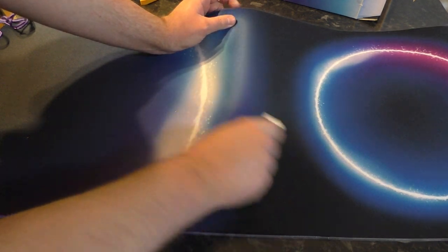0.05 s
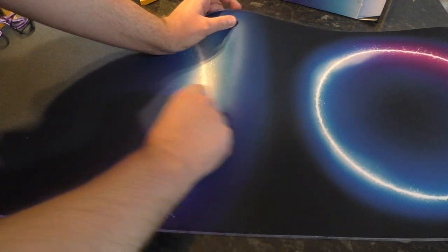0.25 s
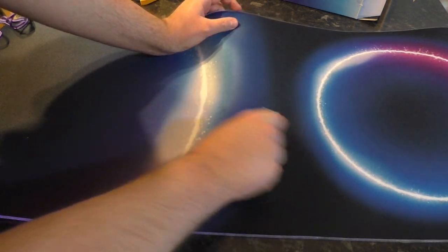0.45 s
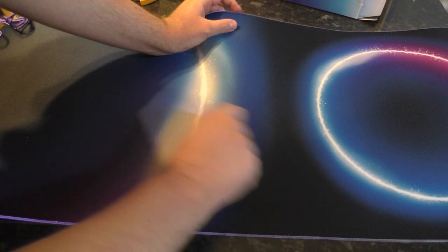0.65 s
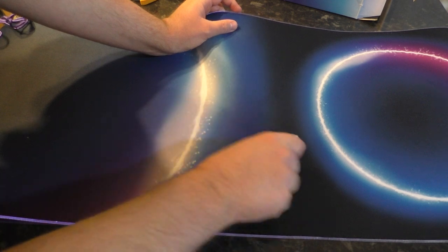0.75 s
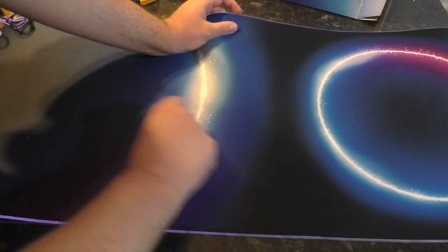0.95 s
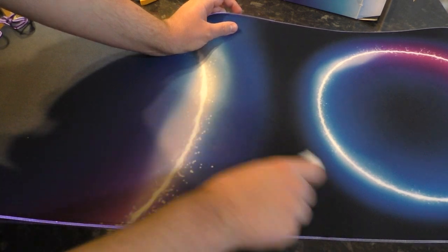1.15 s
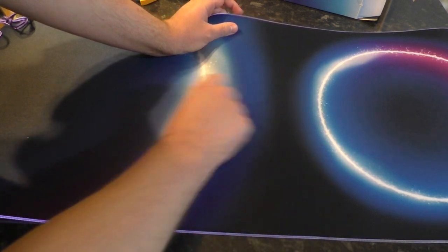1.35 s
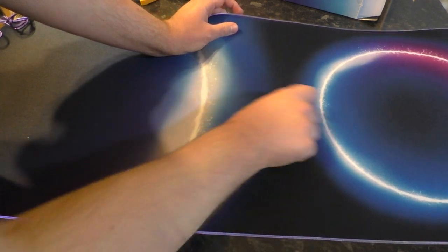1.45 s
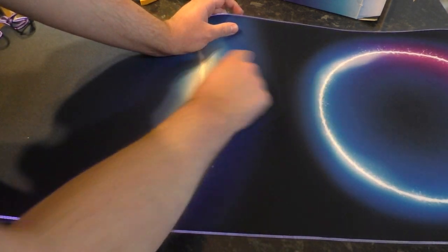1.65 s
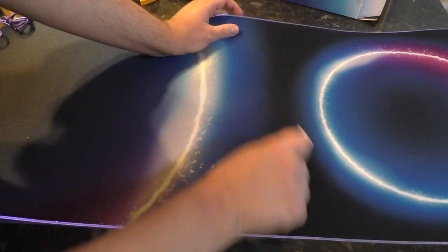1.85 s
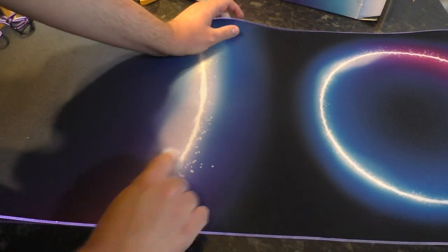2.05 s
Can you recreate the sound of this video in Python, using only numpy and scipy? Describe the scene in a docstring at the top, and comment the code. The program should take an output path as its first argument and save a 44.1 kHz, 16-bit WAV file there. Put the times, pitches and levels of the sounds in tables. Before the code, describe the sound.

Close up in a quiet room, rapid hissing strokes scrub across a fabric mousepad. The object in the hand knocks once and faintly squeaks, the arm bumps the desk with low thuds, then brief ticks and a padded tap follow.

```python
"""A dry hiss swishes back and forth: a fist rubs a small object quickly over a cloth mousepad on a desk,
close to a mono microphone in a quiet room. Fibres catch and let go, so the weave hisses and zips with
the hand's speed; the sharp turns become rounder loops near the end. The desk rumbles and thuds under
the arm. The object knocks hollowly once and squeaks as it sticks and slips; later an edge snags the
cloth with sharp ticks, and a dull tap lands on the padding."""
import sys
import numpy as np
from scipy import signal
from scipy.fft import rfft, irfft, next_fast_len
from scipy.io import wavfile
from scipy.ndimage import map_coordinates

SR = 44100
rng = np.random.default_rng(int(sys.argv[2]) if len(sys.argv) > 2 else 0)


def to_wav(sig):
    """Store sig (one row per channel, or 1-D mono) as 16-bit WAV at the path in sys.argv[1].

    Samples outside -1..1 are clipped; the rate is SR.
    """
    pcm = np.clip(np.atleast_2d(sig), -1, 1) * 32767
    pcm = np.round(pcm).astype(np.int16)
    wavfile.write(sys.argv[1], SR, pcm.T)  # frames by channels


N = 92610
T = np.arange(N) / SR
TOP_HZ = 15780  # the recorder's band limit


def amp(db):
    """Decibels to gain."""
    return 10 ** (np.asarray(db) / 20)


def unit(x):
    """Scale to rms 1."""
    return x / np.sqrt(np.mean(x ** 2) + 1e-20)


def decay(t, t60):
    """An envelope that falls 60 dB in t60 seconds."""
    return 1000 ** (-t / t60)


def filtered(x, response):
    """Filter x by a gain given as a function of frequency."""
    size = next_fast_len(len(x) + 8192)
    return irfft(rfft(x, size) * response(np.fft.rfftfreq(size, 1 / SR)), size)[:len(x)]


def coloured(x, spectrum):
    """Shape x by (f/Hz, level/dB) points and scale to rms 1."""
    f, db = np.transpose(spectrum)
    return unit(filtered(x, lambda hz: amp(np.interp(np.log(hz + 1), np.log(f + 1), db))))


def wobble(per_s):
    """A smooth random curve with per_s knots a second."""
    return map_coordinates(rng.standard_normal(1024), [T * per_s], mode="mirror")


def fuzzy_tone(hz, width_hz):
    """Narrow noise at rms 1 around a pitch given for every sample."""
    a, b = (unit(filtered(rng.standard_normal(N), lambda f: 1 / (1 + (f / width_hz) ** 2)))
            for _ in range(2))
    phase = 2 * np.pi * np.cumsum(hz) / SR
    return unit(a * np.cos(phase) + b * np.sin(phase))


def add(track, start_s, sound):
    """Mix a sound into the track at start_s."""
    part = track[round(start_s * SR):][:len(sound)]
    part += sound[:len(part)]


def shifting_contact(x, depth_db=2, patch_hz=353.4, patch_s=0.05):
    """The colour shifts as the contact changes: random gain patches in time and frequency."""
    hz, t, spectrogram = signal.stft(x, SR, nperseg=512)
    grid = np.meshgrid(hz / patch_hz, t / patch_s, indexing="ij")
    patches = map_coordinates(rng.standard_normal((128, 128)), grid, mode="mirror")
    return signal.istft(spectrogram * amp(depth_db * patches), SR, nperseg=512)[1][:N]


def friction(spectrum, catches_per_s=5000, catch_share=0.29):
    """Countless tiny slips, with stronger grains where fibres catch and let go."""
    catches = unit(rng.standard_normal(N) * (rng.random(N) < catches_per_s / SR))
    slips = rng.standard_normal(N)
    grains = np.sqrt(catch_share) * catches + np.sqrt(1 - catch_share) * slips
    return coloured(shifting_contact(grains), spectrum)


def rubbing():
    """Object on cloth, close up: each stroke speeds up, then slows; faster is louder and brighter."""
    # Hand strokes, each lasting to the next row: turn t/s, speed in the turn/0-1, fastest moment/0-1,
    # level offsets/dB of hiss, treble, rasp, scrape and body, top zip f/Hz
    strokes = [(-.06, 0.23, 0.15, 1.5, -3.5, 2, -3, 2, 6000), (.048, 0.06, .42, 0, -2, 0, -2.5, -2, 6290),
               (.28, 0.27, 0.49, 1, -2.5, 1, 2.5, 5, 6577), (.487, 0.22, 0.41, -1.5, -1.5, 2, -3, 4, 6080),
               (.662, 0.31, 0.54, -2.5, 0.5, 1.5, 1, 1, 6000), (0.829, 0.18, 0.32, 2, -2, 0, -6, 3, 5470),
               (1.011, 0.27, 0.45, -2.5, -0.5, -0.5, -1, -2, 6410),
               (1.207, 0.13, 0.55, 2, 4, 1.5, -3.5, -9, 7640), (1.386, .45, 0.5, 1, 1, 2, 0.5, -1.5, 6430),
               (1.573, 0.32, 0.72, 0.5, 1.5, -2.5, 1, 1, 6650),
               (1.785, 0.9, 0.66, 2.5, 1, 0.5, 3.5, 4.5, 6040),
               (2.015, 0.64, 0.28, -1, -2, -2, -5.5, -14, 7520)]
    # Friction spectra of the five bands, low to high: f/Hz, relative level/dB
    body_spectrum = [(120, -21), (280, -4.5), (430, -2), (590, 2), (740, -14), (1300, -33)]
    scrape_spectrum = [(500, -31), (800, -7.5), (1030, -4.5), (1300, 1), (1520, 1.5), (2000, -7),
                       (3500, -31)]
    rasp_spectrum = [(2400, -22), (3200, -11.5), (3550, -1.5), (3900, -3), (4300, -11), (5500, -36)]
    hiss_spectrum = [(1200, -7), (2100, -6.5), (2600, 1), (3150, -2.5), (3650, -7.5), (4500, -4.5),
                     (6300, -4), (9000, -14), (15500, -21.5)]
    treble_spectrum = [(2500, -40), (4500, -4.5), (6400, -2.5), (7900, 0), (9000, -3), (11500, -7),
                       (14000, -11), (16000, -15.5)]
    last_turn_s = 2.14
    turn_s, turn_speed, fastest, *colours = np.transpose(strokes)
    fastest_s = turn_s + fastest * np.diff(np.r_[turn_s, last_turn_s])
    marks_s = np.sort(np.r_[turn_s, fastest_s, last_turn_s])
    phase = np.interp(T, marks_s, np.arange(len(marks_s))) * np.pi / 2  # half a cycle per stroke
    arch = np.abs(np.sin(phase)) ** 0.82
    loop_speed = np.interp(T, turn_s, turn_speed)  # a rounder turn keeps the hand moving
    speed = np.sqrt(loop_speed ** 2 + (1 - loop_speed ** 2) * arch ** 2)
    hiss_db, treble_db, rasp_db, scrape_db, body_db, zip_hz = (
        np.interp(T, fastest_s, column) for column in colours)

    hiss = amp(-60 + hiss_db) * speed ** 0.83 * friction(hiss_spectrum)
    treble = amp(-58.5 + treble_db) * speed ** 1.41 * friction(treble_spectrum)
    rasp = amp(-63 + rasp_db) * speed * friction(rasp_spectrum)
    dig_db = 2.5 * (0.5 - loop_speed) * np.sin(2 * phase)  # digs in, speeding out of a sharp turn
    scrape_db += dig_db + wobble(per_s=35.44)
    scrape = amp(-64 + scrape_db) * speed ** 0.51 * friction(scrape_spectrum)
    body = amp(-66 + body_db) * speed ** 0.46 * friction(body_spectrum)
    thread_hz = zip_hz * speed  # the threads pass at a rate that follows the hand
    weave_zip = amp(-67.5 + treble_db) * speed * fuzzy_tone(thread_hz, width_hz=270)
    flutter_db = 0.72 * wobble(per_s=70)
    return (hiss + treble + rasp + weave_zip) * amp(flutter_db) + scrape + body


def room_tone():
    """The quiet room behind the desk: steady noise, strongest in the bass."""
    # Room noise spectrum: f/Hz, relative level/dB
    spectrum = [(20, 2.5), (100, -8.5), (250, -15), (550, -15), (800, -23), (1400, -20.5), (3000, -25),
                (8000, -35), (16000, -38)]
    return amp(-68) * coloured(rng.standard_normal(N), spectrum)


def desk_rumble(trim_db=-3.5):
    """The desk shakes with a low rumble while the arm pushes hard."""
    # Strength of the shaking: t/s, level/dB before the trim
    shake = [(0.0, -66), (0.2, -71), (0.24, -44), (0.3, -44.5), (0.33, -33), (0.64, -53), (0.74, -46),
             (0.77, -36.5), (0.81, -40), (1.3, -46.5), (1.34, -68), (1.36, -49), (1.43, -59), (1.46, -61),
             (1.74, -73), (2.1, -57)]
    # Spectrum of the desk's rumble: f/Hz, relative level/dB
    spectrum = [(10, -10), (24, 10), (48, 2), (70, -9), (100, -15), (180, -26), (300, -29.5), (430, -29.5),
                (700, -45), (1500, -110)]
    level_db = np.interp(T, *np.transpose(shake)) + trim_db
    return amp(level_db) * coloured(rng.standard_normal(N), spectrum)


def desk_thuds(attack_s=0.005):
    """The arm bumps the desk: each soft thud is one low, quickly damped tone."""
    # Bumps of the arm: t/s, peak level/dB, f/Hz, t60/s
    thuds = [(0.237, -43, 53.7, 0.11), (0.331, -31.5, 40, 0.15), (0.341, -36, 149, 0.034),
             (.367, -43.5, 176, 0.021), (.38, -37.5, 74, 0.074), (0.43, -45, 129.6, 0.045),
             (0.465, -42, 171, 0.036), (.512, -45.5, 48, 0.17), (.6, -55, 49, 0.22),
             (0.758, -27.5, 37.56, 0.12), (.763, -37.5, 130, 0.05), (.828, -39, 69.7, .08),
             (0.885, -37, 183, 0.032), (.89, -32.5, 58.4, 0.102), (0.952, -39.5, 60, .08),
             (1.05, -36, 44.2, 0.13), (1.133, -44.5, 69, 0.078), (1.271, -40.5, 76, 0.069),
             (1.368, -45, 50, 0.082), (1.41, -41.5, 47.7, 0.066)]
    out, t = np.zeros(N), T[:SR // 4]
    attack = 1 - np.exp(-t / attack_s)
    for start_s, db, hz, t60 in thuds:
        ring = np.sin(2 * np.pi * hz * t) * decay(t, t60) * attack
        add(out, start_s, -amp(db) * ring / np.abs(ring).max())
    return out


def hollow_knock(attack_s=0.0004):
    """The object in the fist is knocked and rings briefly in four modes."""
    # Knock on the object: t/s, level/dB
    knocks = [(.198, -39)]
    # The object's modes: f/Hz, relative level/dB, t60/s
    modes = [(532, 0.5, 0.022), (1180, -5.5, 0.015), (1340, -2, 0.021), (1740, -15, .02)]
    out, t = np.zeros(N), T[:SR // 8]
    attack = 1 - np.exp(-t / attack_s)
    for start_s, db in knocks:
        ring = sum(amp(mode_db + rng.normal(0, 1)) * decay(t, t60) * np.cos(2 * np.pi * hz * t)
                   for hz, mode_db, t60 in modes)
        add(out, start_s, amp(db) * ring * attack)
    return out


def squeaks():
    """The contact sticks and slips: short, rough tones that swell and fade."""
    # Stick-slip bursts: middle t/s, level/dB, f/Hz, half length/s, width/Hz
    bursts = [(0.215, -60, 1550, 0.0082, 170), (.226, -58.5, 1080, 0.0033, 130),
              (1.37, -57, 1400, 0.0047, 90), (1.433, -55.5, 560, 0.0034, 139.7),
              (1.775, -57, 1345, 0.0036, 170), (1.798, -54.5, 1500, 0.0043, 140)]
    out = np.zeros(N)
    for middle_s, db, hz, half_s, width_hz in bursts:
        swell = np.exp(-0.5 * ((T - middle_s) / half_s) ** 2)
        out += amp(db) * swell * fuzzy_tone(np.full(N, hz), width_hz)
    return out


def snag_ticks(width_octaves=0.45):
    """An edge snags the cloth: bright snaps about a millisecond long."""
    # Snags: t/s, peak level/dB, centre f/Hz
    snags = [(1.4893, -41, 7500), (1.491, -35, 11500), (1.564, -46, 7500)]
    out, t = np.zeros(N), T[:SR // 50]
    for start_s, db, centre_hz in snags:
        def band(hz):
            octaves = np.log2((hz + 1) / centre_hz)
            return np.exp(-0.5 * (octaves / width_octaves) ** 2) * (hz < TOP_HZ)
        burst = rng.standard_normal(len(t)) * decay(t, t60=0.0025)
        snap = filtered(burst, band)
        add(out, start_s, amp(db) * snap / np.abs(snap).max())
    return out


def dull_tap(start_s=1.5628, level_db=-38.2, push_hz=440, ring_hz=283.7):
    """A tap on the padding: one short push, a faint low ring and a slight crack."""
    # Spectrum of the crack: f/Hz, relative level/dB
    crack_spectrum = [(800, 13), (2500, -12), (5000, -20)]
    out, t = np.zeros(N), T[:SR // 8]
    push = np.sin(2 * np.pi * push_hz * t) * decay(t, t60=0.006)
    ring = np.sin(2 * np.pi * ring_hz * t) * decay(t, t60=0.086)
    crack = coloured(rng.standard_normal(len(t)), crack_spectrum) * decay(t, t60=0.005)
    tap = push / push.max() + amp(-21) * ring + amp(-9.5) * crack
    add(out, start_s, -amp(level_db) * tap)
    return out


def scene():
    """One microphone close to the mousepad, the same signal in both channels."""
    mono = rubbing() + squeaks() + desk_rumble() + desk_thuds()
    mono += hollow_knock() + dull_tap() + snag_ticks() + room_tone()
    return np.array([mono, mono])


def record(dry):
    """The recorder keeps nothing above its band limit."""
    return np.array([filtered(channel, lambda hz: hz < TOP_HZ) for channel in dry])


dry = scene()
out = record(dry)
to_wav(out)
```